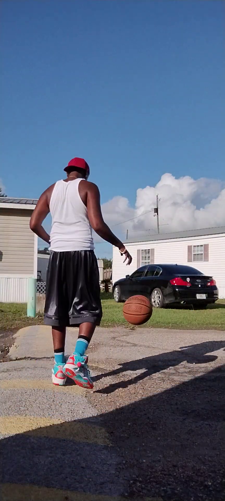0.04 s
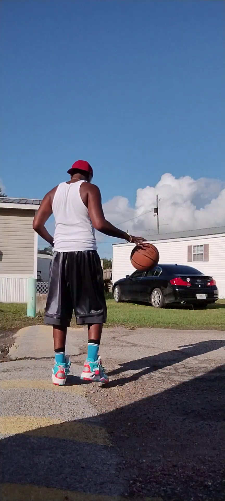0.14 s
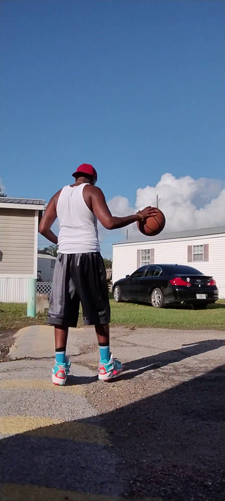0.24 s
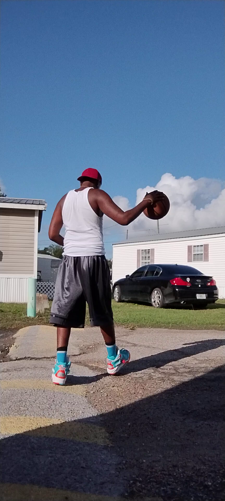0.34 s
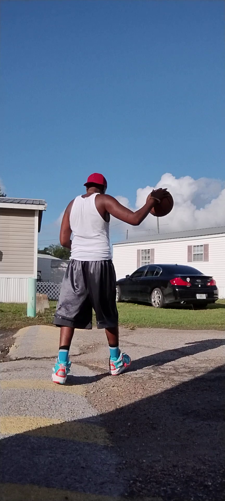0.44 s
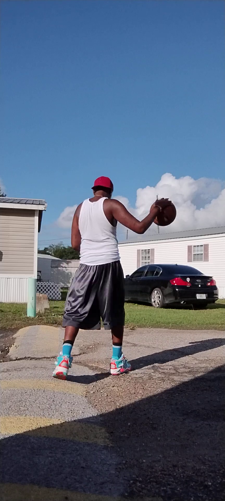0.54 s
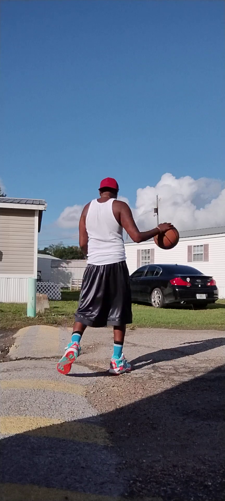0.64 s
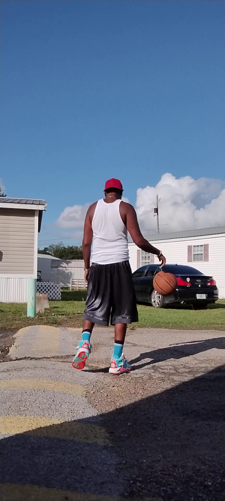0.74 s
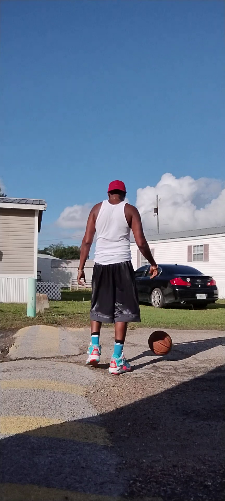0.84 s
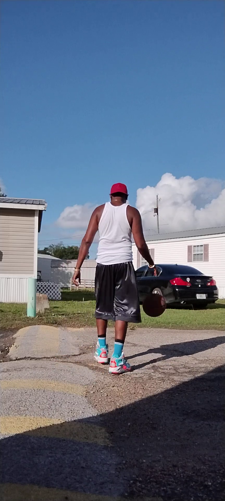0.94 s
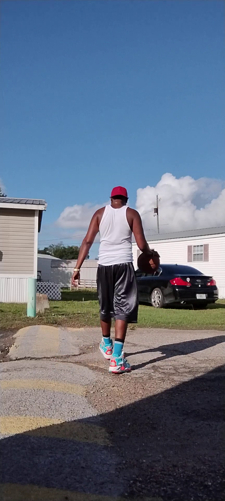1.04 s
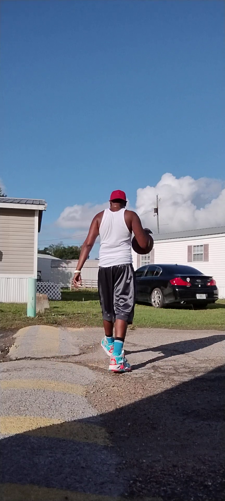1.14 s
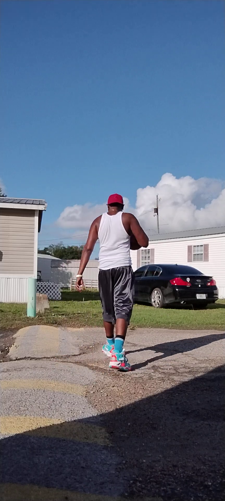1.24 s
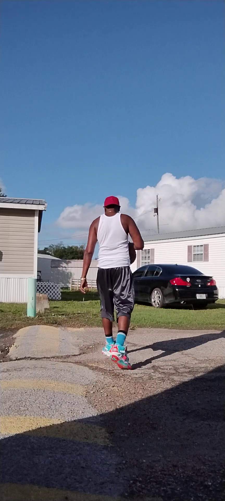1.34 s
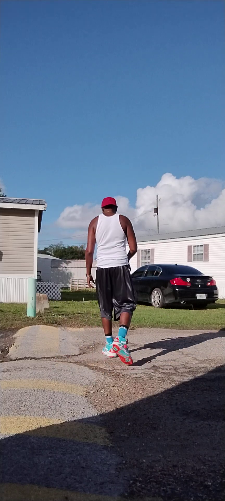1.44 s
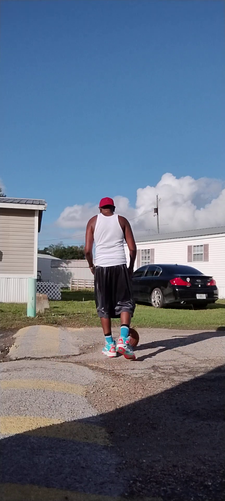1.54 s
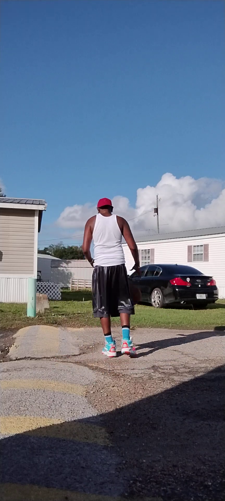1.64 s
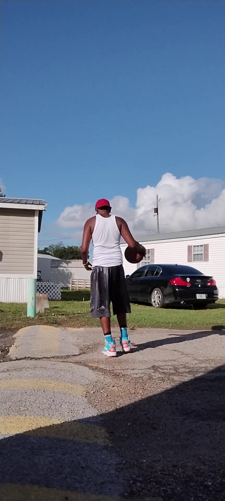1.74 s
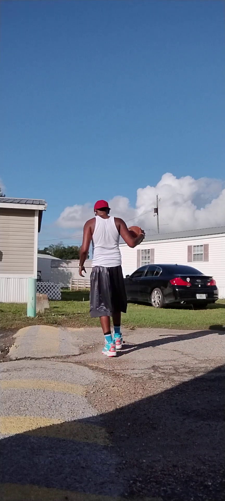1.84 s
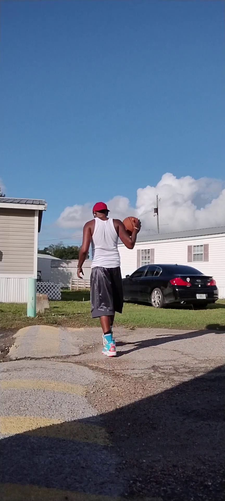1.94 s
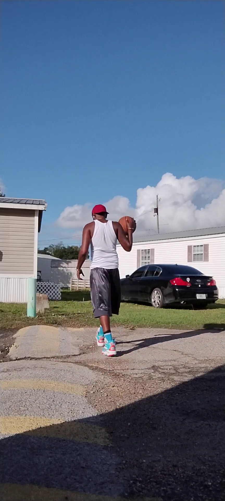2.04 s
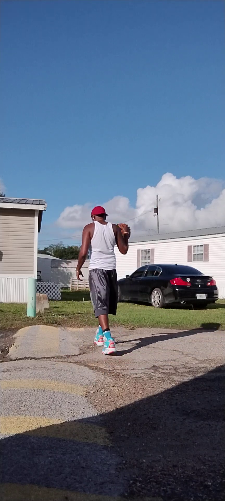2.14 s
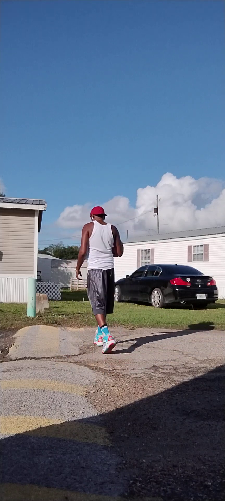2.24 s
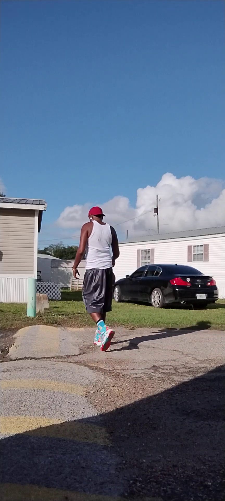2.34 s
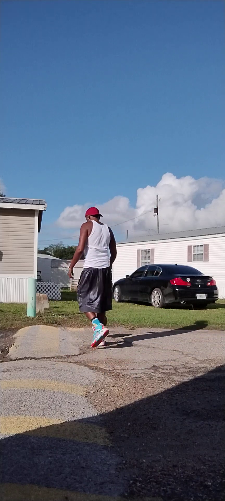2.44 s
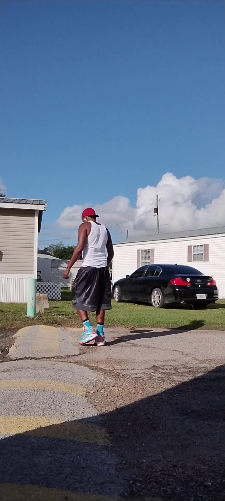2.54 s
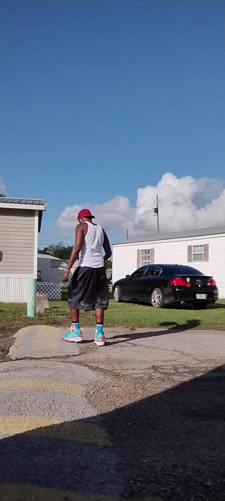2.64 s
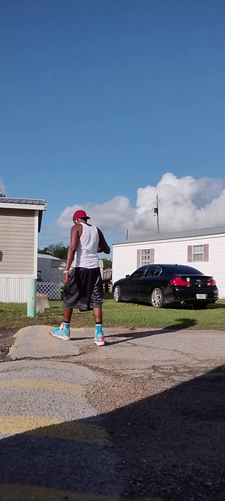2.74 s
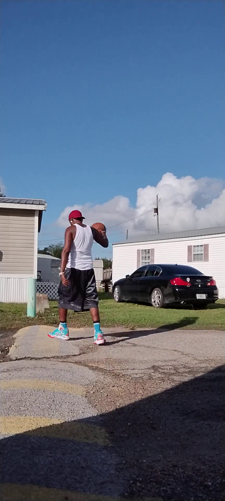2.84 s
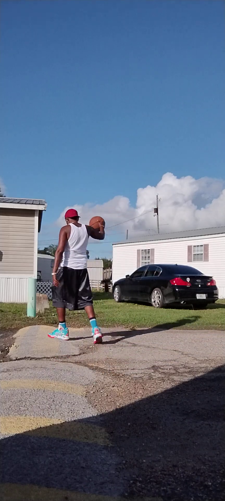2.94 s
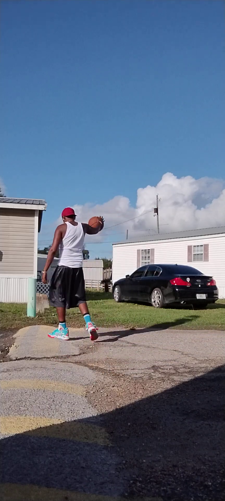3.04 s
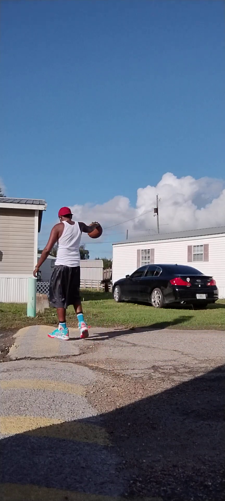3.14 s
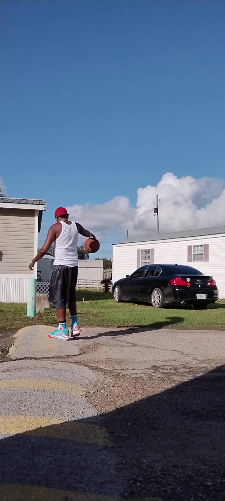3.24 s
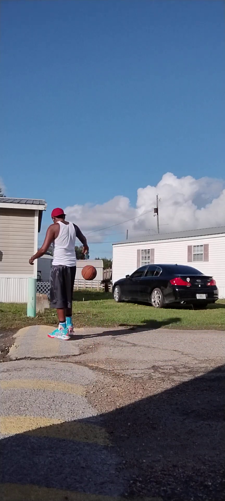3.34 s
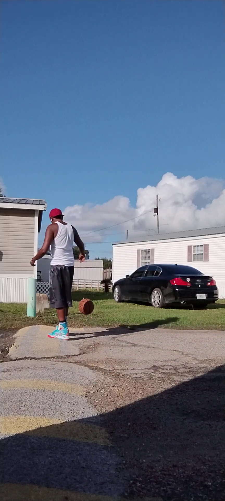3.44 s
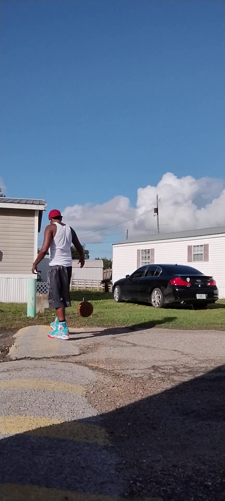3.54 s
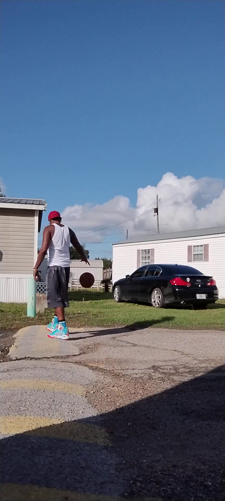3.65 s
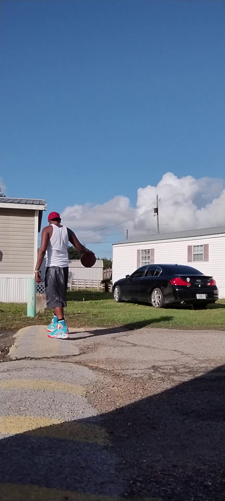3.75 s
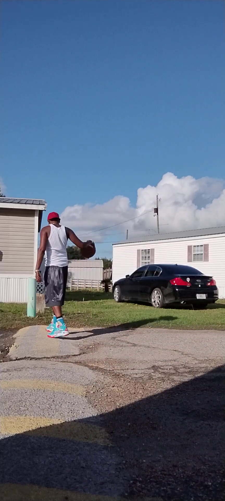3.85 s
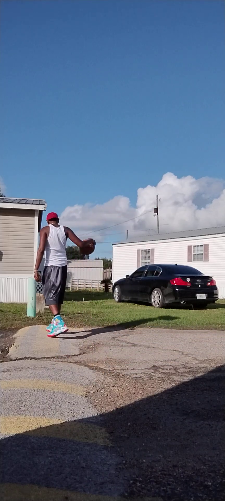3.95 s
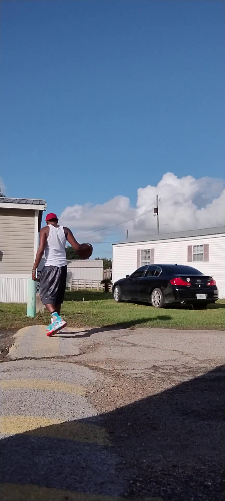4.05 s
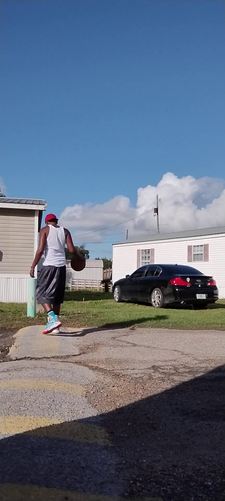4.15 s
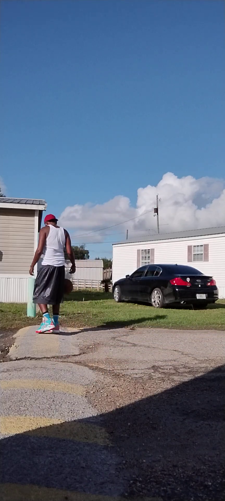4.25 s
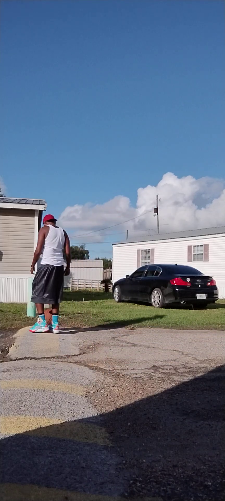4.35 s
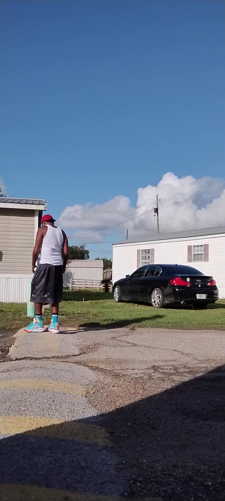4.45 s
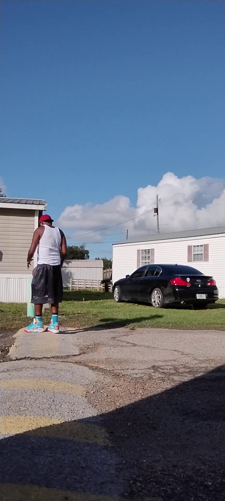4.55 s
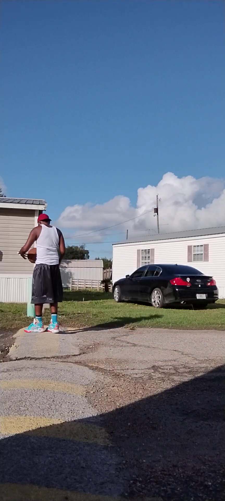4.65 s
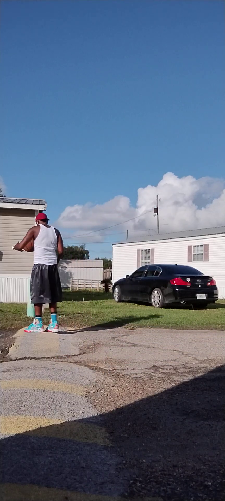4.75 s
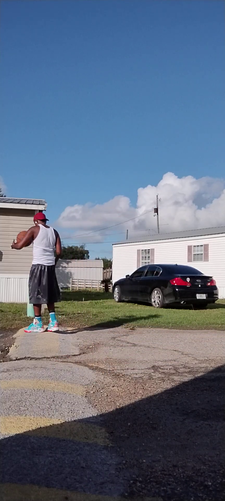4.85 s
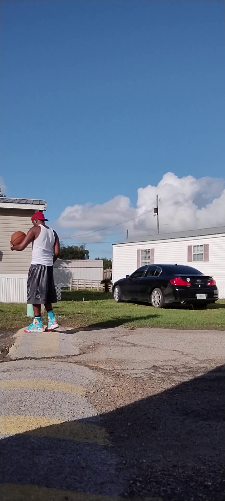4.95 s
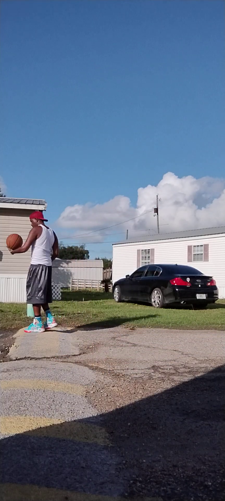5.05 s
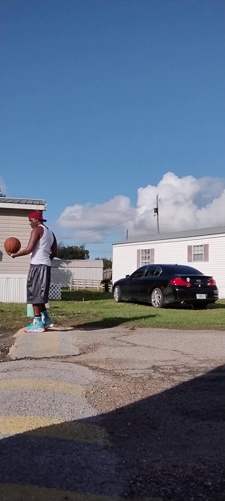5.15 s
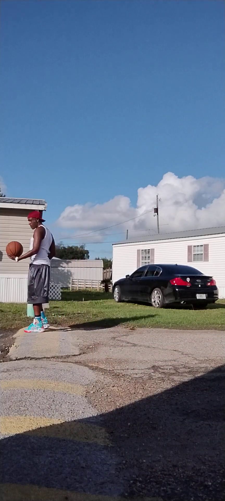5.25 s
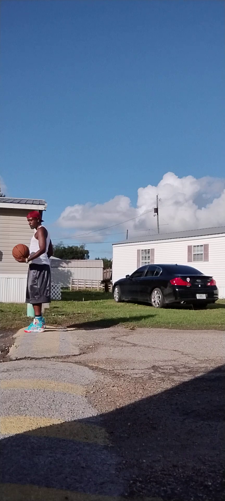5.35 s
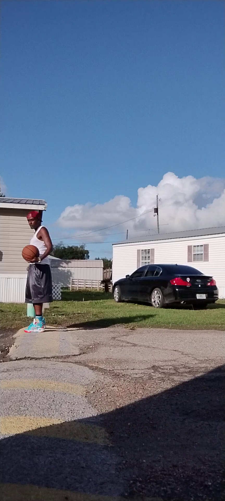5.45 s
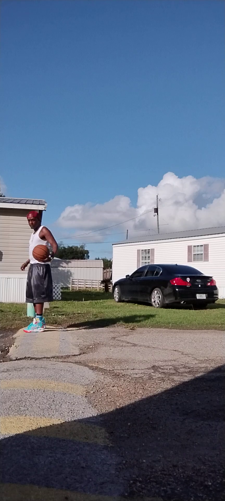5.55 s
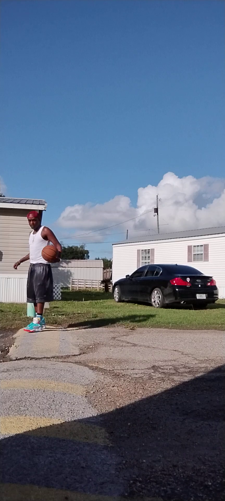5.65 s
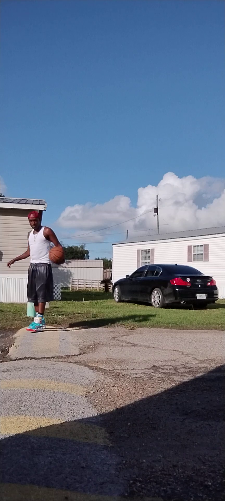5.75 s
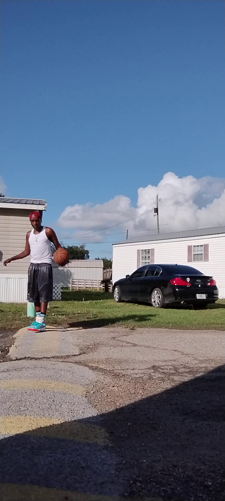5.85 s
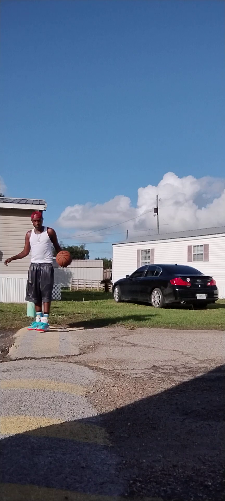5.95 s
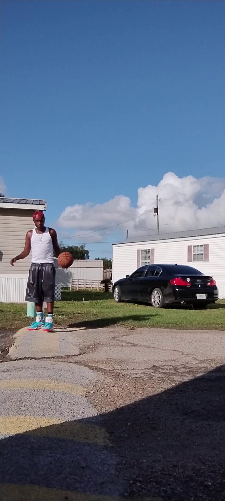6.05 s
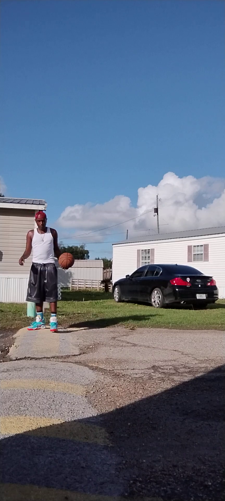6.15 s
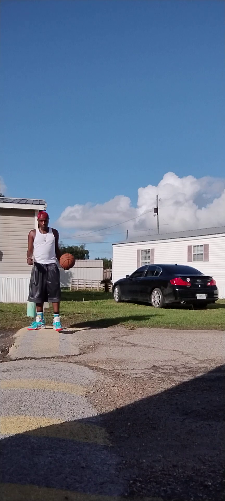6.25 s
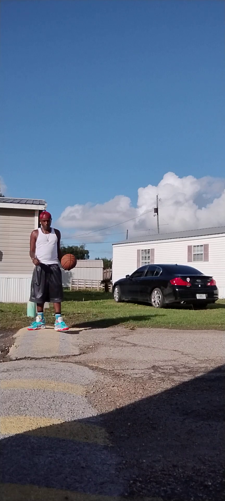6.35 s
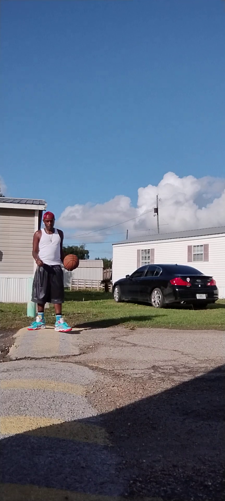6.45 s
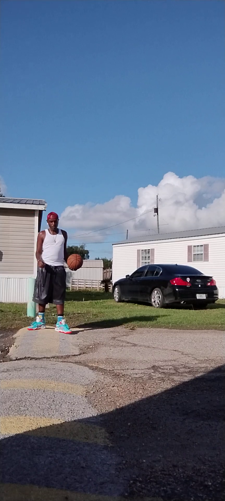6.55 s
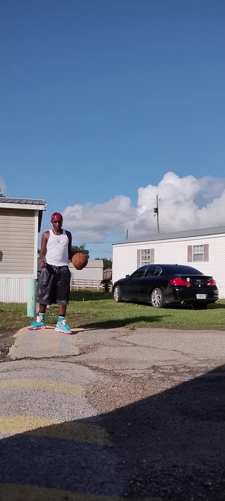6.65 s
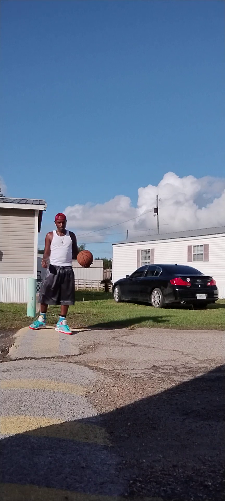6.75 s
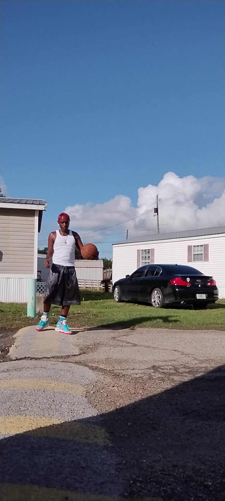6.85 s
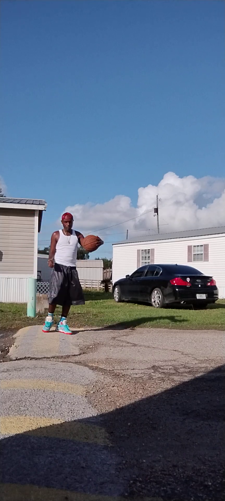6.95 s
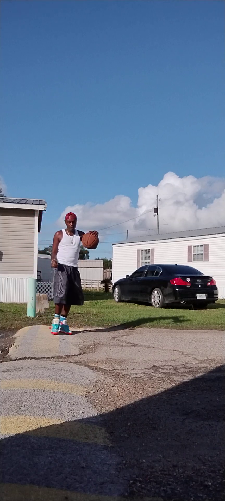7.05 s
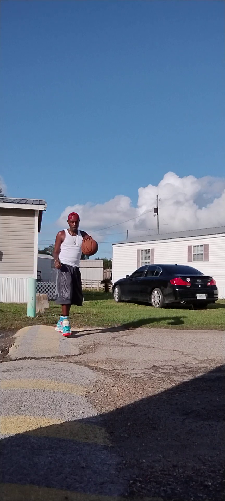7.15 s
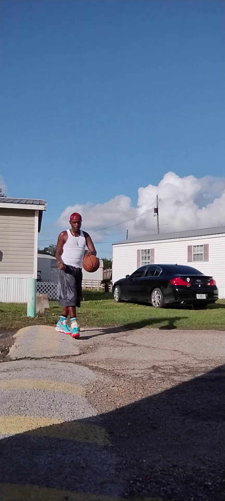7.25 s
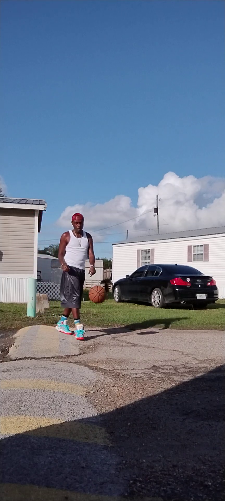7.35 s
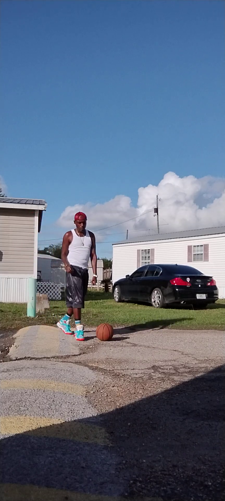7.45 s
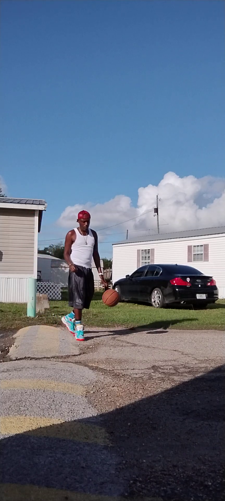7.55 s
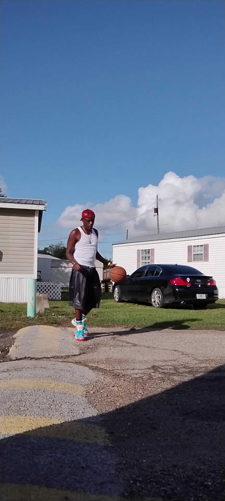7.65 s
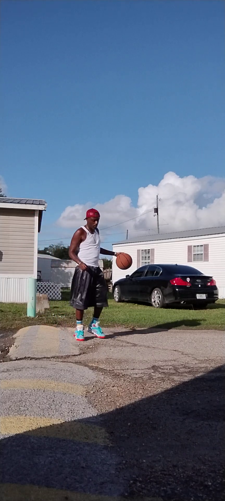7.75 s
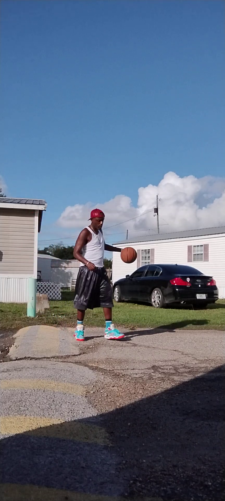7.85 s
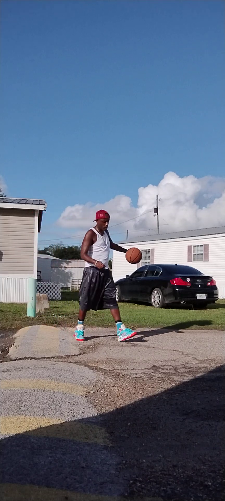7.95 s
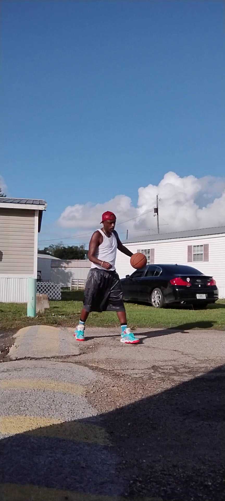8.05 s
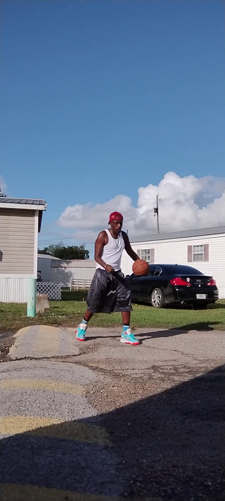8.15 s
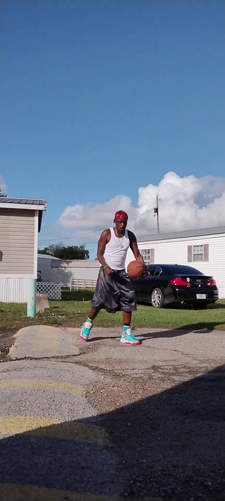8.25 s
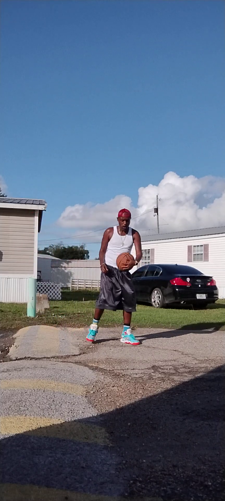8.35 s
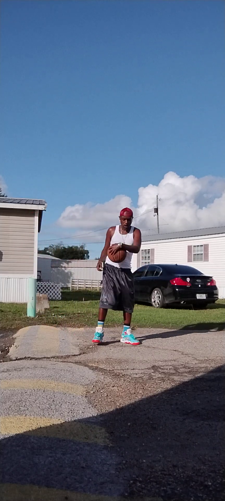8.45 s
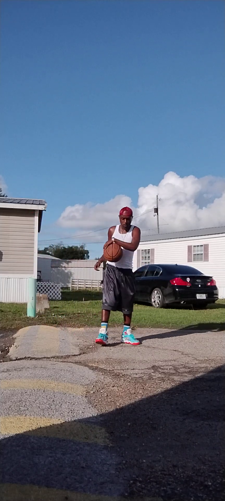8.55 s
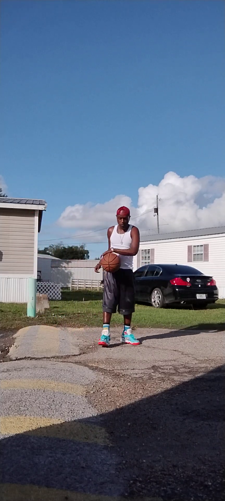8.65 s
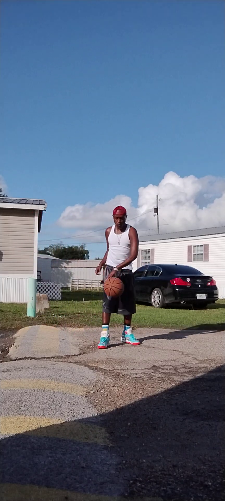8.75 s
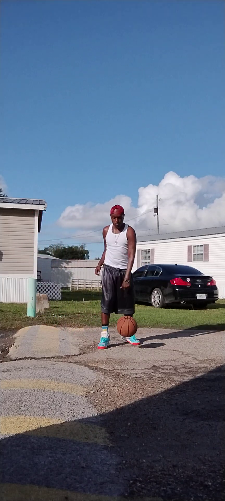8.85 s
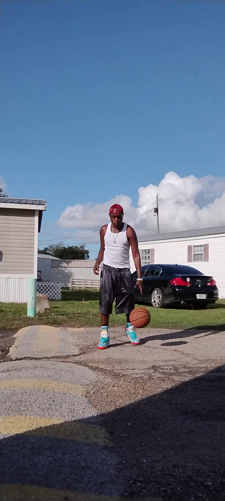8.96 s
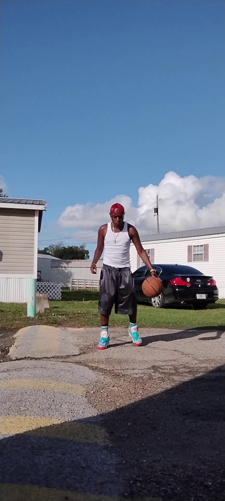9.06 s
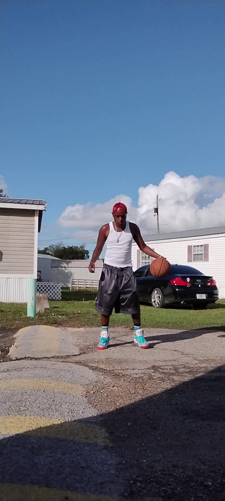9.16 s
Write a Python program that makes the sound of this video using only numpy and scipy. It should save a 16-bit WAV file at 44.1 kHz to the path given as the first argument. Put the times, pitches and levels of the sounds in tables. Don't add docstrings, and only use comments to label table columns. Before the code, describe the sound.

Slow basketball dribbling on a driveway between houses: sharp ringing bounces, low wind rumble, tiny chain ticks, a long pause, then two more bounces.

```python
import sys
import numpy as np
from scipy import signal
from scipy.fft import rfft, irfft, next_fast_len
from scipy.io import wavfile
from scipy.ndimage import uniform_filter1d

SR = 44100
rng = np.random.default_rng(int(sys.argv[2]) if len(sys.argv) > 2 else 0)


def how_loud(loudness_db):
    steps = np.asarray(loudness_db, float) / 20
    return 10 ** steps


def digitize_waveform(pressure):
    field = np.atleast_2d(pressure).T
    bounded = np.clip(field, -1, 1)
    quanta = np.round(bounded * 32767).astype(np.int16)
    wavfile.write(sys.argv[1], SR, quanta)


N = 405279

# start_s, traffic_db, rustle_db
SURROUNDINGS = [(0.0, -59, -63), (0.33, -57.5, -65.5), (0.97, -59, -60.5), (1.12, -50.5, -63.5),
                (2.48, -58, -64), (2.74, -56.5, -63.5), (5.22, -59.5, -71), (7.07, -60, -72),
                (7.52, -55.5, -64), (8.88, -60, -69), (9.19, -52.5, -113)]


def rms_one(x):
    return x / np.sqrt(np.mean(x ** 2) + 1e-20)


def in_time(rows, outside_db=None):
    s, *columns = np.transpose(rows)
    return [np.interp(np.arange(N) / SR, s, c, outside_db, outside_db) for c in columns]


def at_hz(points, hz):
    return np.interp(np.log(hz), np.log(np.array(points)[:, 0]), np.array(points)[:, 1])


def drift(rate):
    r = np.exp(-80 * np.pi * rate / SR)
    slow = signal.lfilter([1], [1, -2 * r, r * r], rng.standard_normal(N // 40 + 2002))[2000:]
    return np.interp(np.arange(N) / 40, np.arange(len(slow)), rms_one(slow))


def modes(table, t, spread_db, detune, turn):
    hz, level_db, t60 = np.transpose(table)[:, :, None]
    luck = rng.standard_normal((3, len(table), 1))
    cycles = hz * (1 + detune * luck[1]) * t + turn * luck[2]
    fading = how_loud(level_db + spread_db * luck[0] - 60 * t / t60)
    return np.sum(fading * np.cos(2 * np.pi * cycles), axis=0)


def band(x, low_hz, high_hz):
    return signal.sosfilt(signal.butter(2, [low_hz, min(high_hz, .45 * SR)], "band", fs=SR, output="sos"), x)


def hiss_band(length, low_hz, high_hz):
    return band(rng.standard_normal((2, length)), low_hz, high_hz)


def add(out, s, sound):
    i = int(np.clip(round(s * SR), 0, N))
    out[:, i:i + sound.shape[-1]] += sound[..., :N - i]


def pan(x, lr_db):
    return x * how_loud([[lr_db / 2], [-lr_db / 2]])


def coloured(spectrum, patchy_db):
    # pitch_hz, likeness (-1 to 1)
    likeness = [(60, 0.98), (150, 0.99), (380, 0.85), (950, 0.56), (2380, 0.073), (5980, -0.13),
                (15000, -0.13)]
    # pitch_hz, left_right_db
    balance = [(60, 0.5), (180, 0), (550, -1), (1650, 4.5), (4970, 0.0), (15000, -8.5)]
    size = next_fast_len(N, True)
    hz = np.maximum(np.arange(size // 2 + 1) * SR / size, 1)
    mid, side = rfft(rng.standard_normal((2, size))) * how_loud(at_hz(spectrum, hz))
    alike = np.clip(at_hz(likeness, hz), -1, 1)
    pair = np.sqrt(1 + alike) * mid + np.sqrt(1 - alike) * side * [[1], [-1]]
    pair = pair * how_loud(np.outer([.5, -.5], at_hz(balance, hz)))
    return rms_one(irfft(pair, size)[:, :N] * how_loud(patchy_db * drift(9.8)))


def patches(x, depth_db):
    spots = signal.stft(x, nperseg=1024)[2]
    field = rng.standard_normal(spots.shape[1:])
    field = uniform_filter1d(uniform_filter1d(field, size=9, axis=0), size=4, axis=1)
    return signal.istft(spots * how_loud(depth_db * rms_one(field)), nperseg=1024)[1][:, :N]


def gusts():
    # peak_s, fall_s (time to fall 10 dB, held to at least 0.01), left_db, right_db
    gust_table = [(0.1, 0.01, -22, -57), (0.8, -1.05, -44, -66), (1.05, -0.01, -33, -38),
                  (1.2, .09, -25, -54), (1.5, 0.1453, -18, -28), (1.65, 0.21, -33, -25),
                  (1.83, 0.1047, -23, -36), (2.12, 0.15, -35.5, -36), (2.33, 0.06, -31, -55),
                  (2.67, 0.0756, -25.5, -27), (2.901, 0.0458, -21, -40), (3.09, 0.06, -20.5, -31),
                  (3.24, 0.15, -41, -58), (3.4, 0.5, -44, -45), (3.6, -0.13, -39, -52),
                  (3.702, -0.17, -82, -31), (4.002, 0.02, -17, -55), (4.15, 0.13, -56, -52),
                  (4.3, 0.3, -40.5, -44), (4.58, 0.0376, -20.5, -19), (9.0, 0.04, -19, -23.5),
                  (9.1, 0.12, -24, -27)]
    # pitch_hz, level_db (per Hz)
    gust_colour = [(30, -9), (55, 1), (85, 8.5), (120, -0.5), (200, -6.5), (300, -13.5), (450, -33.5),
                   (700, -57.5)]
    breeze_db = -61.5
    size = next_fast_len(N, True)
    hz = np.maximum(np.arange(size // 2 + 1) * SR / size, 1)
    noise = irfft(rfft(rng.standard_normal((2, size))) * how_loud(at_hz(gust_colour, hz)), size)[:, :N]
    lumps = how_loud(1.54 * np.array([drift(40), drift(18.0)]))
    steps = np.arange(0, N, 100) / SR
    force = how_loud(breeze_db)
    for s, fall, left_db, right_db in gust_table:
        force = force + how_loud([[left_db], [right_db]] - 10 * abs(steps - s) / max(fall, .01))
    force = np.array([np.interp(np.arange(N) / SR, steps, f) for f in force])
    return force * how_loud(-4.5) * rms_one(noise * lumps)


def buffets():
    # peak_s, peak_db, pitch_hz
    left_puffs = [(0.842, -24, 106), (1.121, -19, 111.6), (1.157, -23.5, 102.6), (1.199, -19, 90.5),
                  (1.232, -18, 84), (1.29, -26.5, 134), (1.328, -18, 119), (1.411, -18, 124),
                  (1.478, -12, 128), (1.529, -14, 159), (1.564, -16.5, 154), (1.818, -17, 106),
                  (1.849, -20.5, 126.3), (1.923, -20, 138), (2.023, -24, 110), (2.169, -23, 102),
                  (2.274, -24, 107), (2.35, -21.5, 106), (2.431, -21.5, 84.4), (2.848, -18, 114.4),
                  (2.937, -13, 138), (2.978, -16.5, 123), (3.08, -18, 101), (3.153, -19.5, 104.5),
                  (3.961, -22.5, 112), (4.064, -21, 97), (4.322, -20, 121), (4.644, -23, 106),
                  (9.053, -19, 135), (9.09, -19, 115)]
    # peak_s, peak_db, pitch_hz
    right_puffs = [
        (1.241, -28, 101),
        (1.264, -21.5, 96),
        (1.415, -22, 180),
        (1.49, -15, 112),
        (1.549, -16.5, 149),
        (1.572, -29, 112),
        (3.299, -25, 100),
        (8.979, -43, 121),
        (9.063, -22, 138),
        (9.102, -26, 141),
    ]
    out, t = np.zeros((2, N)), np.arange(-1500, 1500) / SR
    for port, rows in zip(np.eye(2)[:, :, None], (left_puffs, right_puffs)):
        for s, peak_db, puff_hz in rows:
            swell = np.exp(-(t * puff_hz / 0.75) ** 2)
            puff = swell * np.cos(2 * np.pi * (puff_hz * t + rng.random()))
            add(out, s + t[0], how_loud(peak_db) * puff * port)
    return out


def traffic():
    # pitch_hz, level_db (per Hz)
    traffic_colour = [(20, -38), (43, -9.5), (109, -0.5), (190, -11), (400, -19), (1860, -29), (3180, -37),
                      (14000, -50)]
    traffic_db = in_time(SURROUNDINGS)[0]
    swell_db = 0.9 * (traffic_db - np.median(traffic_db))
    return how_loud(-49.5 + swell_db) * coloured(traffic_colour, patchy_db=1.1)


def rustle():
    rustle_db = in_time(SURROUNDINGS)[1]
    snaps = rng.random(N) < 150.0 * how_loud(6.0 * drift(4)) / SR
    crackle = 1 + 2.2 * snaps * rng.exponential(1, N)
    hiss = rms_one(band(rng.standard_normal((2, N)) * crackle, 8300, 15600))
    return how_loud(rustle_db - 5 + 0.62 * drift(46)) * hiss


def far_hum():
    return how_loud(-78 + 1.5 * drift(3)) * rms_one(hiss_band(N, 1750, 2330))


def whistles():
    # start_s, end_s, pitch_hz, level_db
    whistle_table = [(4.1, 4.4, 2830, -81), (4.6, 5.05, 2835, -75), (5.1, 5.22, 2850, -77),
                     (5.6, 5.78, 2850, -78), (6.28, 6.43, 2255, -69), (6.54, 6.67, 2255, -70),
                     (6.68, 6.9, 2210, -75), (5.2, 5.45, 2025, -75), (5.3, 6.2, 1900, -76),
                     (3.75, 4.12, 1880, -71), (4.7, 5.15, 2220, -77), (0, 9.19, 532, -67)]
    out = np.zeros((2, N))
    waver_db, waver_hz = 4 * drift(12), 10 * drift(14)
    for start, end, line_hz, line_db in whistle_table:
        span = slice(int(start * SR), int(end * SR))
        on = np.sin(np.linspace(0, np.pi, span.stop - span.start)) ** .5
        cycles = np.cumsum(line_hz + waver_hz[span]) / SR
        add(out, start, on * how_loud(line_db + waver_db[span]) * np.sin(2 * np.pi * cycles))
    return out


def ticks():
    # start_s, peak_db, ringing_share (0-1), left_right_db
    tick_table = [(0.0034, -34.5, 0.48, -3.5), (0.3476, -54, 0.1, -5), (.571, -56, .1, -2),
                  (.659, -54, .2, -2), (7.377, -56, .1, -2), (7.486, -56, .1, -2), (7.497, -54, .3, -2),
                  (7.513, -56, .1, -2), (7.523, -52, .05, -2), (7.549, -57, .1, -2), (5.44, -59, .1, -2),
                  (5.78, -59, .2, -2), (6.815, -59, .1, -2), (5.67, -57, .2, -2), (0.3753, -50, 0.27, 0),
                  (0.6473, -47, 0.3, -5), (0.708, -52, 0.4, -2.0), (0.898, -43, 0.4, -1),
                  (0.909, -47, 0.3, -4), (0.927, -44.5, 0.35, -7), (1.138, -37, 0.3, -1),
                  (1.255, -45, 0.48, -4), (1.495, -44.5, 0.1, -7), (1.784, -53, 0.27, -17),
                  (1.8927, -46.5, 0.44, -1.5), (2.35, -45.5, 0.15, -1.0), (2.378, -47, 0.3, -1.0),
                  (2.413, -46, 0.27, -1), (2.6989, -45, 0.4, -8), (2.8973, -41, 0.12, -2),
                  (2.9651, -37.5, 0.27, 4), (3.047, -41.5, 0.47, -9), (3.4096, -56, 0.4, -1.5),
                  (4.174, -52, 0.42, -5), (4.8474, -51, 0.6, 2), (5.654, -56, 0, -9),
                  (7.065, -51.5, 0.26, -6), (7.453, -45.5, 0.14, -5), (8.0531, -47, 0.65, 6),
                  (8.214, -46, 0.22, -1), (8.631, -54, 0.55, -3), (8.9785, -56, 0.3, -22)]
    # pitch_hz, level_db, t60_s
    link_modes = [(9100, -1, 0.031), (10060, -4, 0.078), (9630, 9, 0.052), (11060, 14.5, 0.018),
                  (12300, -23, .03), (13100, -2, .025)]
    out, t = np.zeros((2, N)), np.arange(int(.15 * SR)) / SR
    for s, peak_db, rings, lr_db in tick_table:
        rings = np.clip(rings, 0, 1)
        dry_grit = (how_loud(-60 * t / 0.011) + how_loud(-12 - 60 * t / 0.2)) * hiss_band(len(t), 4750, 21000)
        link = modes(link_modes, t, spread_db=3.0, detune=.006, turn=.3)
        blend = (1 - rings) * dry_grit + 0.57 * rings ** 2 * link
        add(out, s, pan(how_loud(peak_db + 1.5) * (1 - np.exp(-t / .0014)) * blend, lr_db))
    return out


def wall_echoes(out, s, near, echo_db, second_db, push, bright):
    # delay_s (after the nearest wall), level_db, left_right_db
    wall_table = [(0, -2, 1.5), (.0065, -2, -1.5), (.013, -11, -1), (0.021, -5.5, 1), (0.035, -14, 2),
                  (.095, -18, 1.5), (.112, -17, 5), (0.161, -21, 1)]
    for k, (delay, wall_db, lr_db) in enumerate(wall_table):
        ribs = rng.standard_normal((2, 900)) * np.hanning(900) ** 2.6 * how_loud(-29.5)
        echo = push + signal.fftconvolve(ribs, [bright], axes=1)[:, :len(push)]
        level = how_loud(echo_db + wall_db + second_db * (k == 1))
        add(out, s + near + delay * (1 + .05 * rng.standard_normal()), pan(echo, lr_db) * level)


def scatter(t, near, slap_db):
    first_echoes = np.exp(-((t - near - .015) / 0.0049) ** 2)
    tail = how_loud(slap_db - 23 - 60 * t / 0.79) * (0.67 + first_echoes * 0.96)
    return tail * (1.5 * hiss_band(len(t), 300, 1350) + .6 * hiss_band(len(t), 1400, 3200))


def bounces():
    # start_s, slap_db (peak), push_db, grit_db, echo_delay_s (nearest wall)
    bounce_table = [
        (0.057, -12, -13, -28, 0.056),
        (0.9665, -7, -15.5, -29.5, 0.053),
        (1.645, -11, -12.5, -37, 0.048),
        (2.6075, -13, -13.5, -40, 0.043),
        (3.6345, -17, -15.5, -34, 0.042),
        (4.496, -12.5, -17, -41, .040),
        (7.5795, -14.5, -16, -38, 0.048),
        (9.017, -17, -16.5, -34, 0.049),
    ]
    # shell_db, casing_db, ring_db (cavity), then over it low_db, middle_db, upper_db, top_db;
    # tilt_db (casing low over high)
    paving = [(-16, -21.5, -21.5, -8, 4, .5, -4, -5), (-16, -21.5, -16, -8.5, .5, -.5, -9, 2),
              (-13.5, -24.5, -24.5, 4, -8.5, -14, -9, -6), (-17.5, -26, -29, -4.5, 0, -1.5, -5, 9),
              (-30, -25.5, -22.5, -8.5, -9.5, -1.5, -14, 0), (-25.5, -30.5, -27, -10.5, 0, -2, -15, 7),
              (-23.5, -25.5, -16, -7.5, -4.5, -4.5, -14, -3), (-18, -23, -27, -1, 7, 0, -9, 9)]
    # slap_s (after the push starts), cushion_db, walls_db, second_db (second wall)
    landing = [(-.0003, -24, 2, -12), (0.0002, -24, -1.5, -9), (-.0008, -20, -1, -1), (-.0004, -18, -2, -8),
               (.0003, -21, -5, -1), (.0006, -22, -4, -6), (.0009, -24, -3.5, 3), (.0012, -12, 0, -8)]
    # pitch_hz, level_db, t60_s
    cavity_modes = np.array([(724, 4, .022), (840, -2.5, 0.027), (969.5, -17, 0.14), (975, 2.5, 0.022),
                             (1106, -3.5, 0.04), (1202, -3, 0.04), (1435, -5.5, 0.054), (1567, -3.5, 0.034),
                             (1681, -2, 0.045), (1787, 0.5, 0.035), (2060, 3, 0.014), (2290, -6.5, 0.041),
                             (2648, -6.5, 0.055), (3100, -10, 0.015)])
    paving_hz = [730, 1030, 1350, 1700, 2400]
    # pitch_hz, level_db, t60_s
    push_modes = [(138, -4.5, 0.045)]
    # pitch_hz, level_db, t60_s
    shell_modes = [(242.4, 0.0018, 0.042)]
    # pitch_hz, level_db, t60_s
    casing_modes = [(365, -4, .035), (430, -5, .03), (495, -2, .045), (570, -5, .025), (650, -4, .03)]
    rebound_s = 0.00803
    port_lag = 7.8
    only_level = [0, 1, 0]
    out, t = np.zeros((2, N)), np.arange(int(.3 * SR)) / SR
    for bounce, ground, land in zip(bounce_table, paving, landing):
        s, slap_db, push_db, grit_db, near = bounce
        shell_db, casing_db, ring_db, low_db, middle_db, upper_db, top_db, tilt_db = ground
        slap_s, cushion_db, walls_db, second_db = land

        fall = t[:900] - .008
        cushion = -how_loud(cushion_db) * np.exp(-np.abs(fall) / np.where(fall < 0, .0025, .0008))
        add(out, s + slap_s - .0073, cushion * [[1], [1]])

        contact = (1 - np.exp(-t / .003)) ** 2
        shell = how_loud(shell_db + 11) * modes(shell_modes, t - .001, spread_db=.5, detune=.02, turn=.01)
        air = how_loud(push_db + 17.5) * modes(push_modes, t - .001, spread_db=.5, detune=.02, turn=.01)
        push = contact * (shell - air)

        since = np.maximum(t - rebound_s, 0)
        tilt = np.linspace(.5, -.5, len(casing_modes)) * tilt_db
        tilted = casing_modes + np.outer(tilt, only_level)
        casing = modes(tilted, since, spread_db=2.5, detune=0.03, turn=0.31)
        casing = how_loud(casing_db + 10.5) * (1 - np.exp(-since / 0.0038)) * casing

        touch = 1 - np.exp(-t / .0006)
        ground_colour = np.c_[paving_hz, [low_db, 0, middle_db, upper_db, top_db]]
        struck_db = ring_db + at_hz(ground_colour, cavity_modes[:, 0])
        struck = cavity_modes + np.outer(struck_db, only_level)
        slap = -touch * how_loud(3.5) * modes(struck, t - .0005, spread_db=0.0, detune=0.012, turn=0.13)
        rough = touch * how_loud(slap_db - 16.5 - 60 * t / 0.082) * hiss_band(len(t), 500, 2440)
        crunch = hiss_band(len(t), 1870, 6120) + how_loud(-2.5) * hiss_band(len(t), 9460, 13300)
        grit = how_loud(grit_db + 5.0 - 60 * t / 0.033) * crunch
        late = np.interp(t - port_lag / SR, t, slap, 0)
        add(out, s, push + pan(casing, -3.0))
        add(out, s + slap_s, pan(np.array([late, slap]) + rough, 1.5) + pan(grit, -2.5))

        lead_in = np.linspace(0, 1, 265) * hiss_band(265, 500, 3100)
        add(out, s + slap_s - .006, how_loud(slap_db - 25) * lead_in)

        echo_db = 4.0 - 320 * near + walls_db
        bright = slap + 1.3 * casing + how_loud(0.6) * grit[0]
        wall_echoes(out, s, near, echo_db, second_db, push, bright)
        add(out, s, scatter(t, near, slap_db))
    return out


def whine():
    # start_s, pitch_hz, level_db
    whine_table = [
        (0.8, 827, -66),
        (1.3, 812, -66),
        (2.3, 815, -72),
        (3.0, 815, -61.5),
        (3.4, 829, -65.5),
        (4.3, 805.5, -66.5),
        (5.2, 798, -66.5),
        (5.9, 800, -63.5),
        (6.5, 814, -75.5),
    ]
    hz, level_db = in_time(whine_table)[0], in_time(whine_table, -120)[1]
    cycles = np.cumsum(hz + 3 * drift(15) + 5 * drift(3)) / SR
    return how_loud(level_db + 2.5 * drift(7)) * np.sin(2 * np.pi * cycles)


def scuffs():
    # start_s, peak_db, pitch_hz (centre), t60_s
    scuff_table = [(1.113, -55, 1500, 0.1), (1.135, -39, 2072, 0.035), (1.137, -49, 3570, 0.02),
                   (1.786, -50, 885, 0.029), (2.872, -55, 940, 0.03), (2.869, -58, 1600, .03),
                   (2.882, -45, 1720, 0.022), (2.883, -50, 800, 0.025), (2.896, -45, 1650, 0.02),
                   (2.92, -50, 900, 0.022), (2.896, -28, 720, 0.02), (4.325, -57, 890, 0.062),
                   (4.335, -60.5, 1710, 0.044), (5.43, -60, 895, 0.12), (5.645, -63, 1800, 0.075),
                   (5.67, -60.5, 1720, 0.082), (7.721, -52, 1977, 0.038), (7.374, -45, 850, 0.02),
                   (7.454, -31.5, 700, 0.018), (8.186, -64.5, 1670, 0.17), (9.16, -52, 2000, 0.04),
                   (9.125, -62, 1380, .2), (2.963, -58, 3300, .02)]
    out, t = np.zeros((2, N)), np.arange(int(.25 * SR)) / SR
    for s, peak_db, hz, t60 in scuff_table:
        grains = rng.standard_normal((2, len(t))) * (1 + 5 * (rng.random(len(t)) < 600 / SR))
        burst = band(grains + grains[0], hz / 1.25, hz * 1.2)
        burst = rms_one(band(burst, hz / 1.8, hz * 1.5))
        add(out, s, how_loud(peak_db + 11.0 - 60 * t / t60) * (1 - np.exp(-t / 0.0029)) * burst)
    return out


def drags():
    # start_s, end_s, level_db
    drag_table = [
        (1.15, 1.26, -60),
        (1.46, 1.5, -56),
        (1.87, 1.98, -62),
        (2.34, 2.45, -60),
        (2.67, 2.705, -52),
        (2.865, 2.905, -54),
        (2.962, 2.995, -51),
        (2.998, 3.055, -51),
        (3.05, 3.14, -60),
        (3.32, 3.43, -62),
    ]
    noise, stroke = rng.standard_normal((2, N)), np.zeros((1, N))
    rub = rms_one(band(noise, 7100, 12500) + 0.88 * band(noise, 9100, 10500))
    for start, end, level_db in drag_table:
        swell = np.sin(np.linspace(0, np.pi, int((end - start) * SR))) ** .5
        add(stroke, start, how_loud(level_db) * swell)
    return pan(rub * stroke * how_loud(-5.5 + 4.4 * drift(63)), -1.5)


def passing_car():
    # start_s, level_db
    car_table = [
        (6.5, -89),
        (7.0, -60.5),
        (7.4, -55),
        (7.7, -51.5),
        (8.2, -63),
        (8.7, -92),
    ]
    # pitch_hz, level_db (per Hz)
    tyre_colour = [(150, -10), (300, 15.5), (600, 7), (1000, 9.5), (1500, 1.5), (2300, -42), (4000, -128)]
    return how_loud(in_time(car_table, -120)[0]) * coloured(tyre_colour, patchy_db=.4)


def scene():
    backdrop = patches(traffic() + rustle() + far_hum() + passing_car(), depth_db=1.3)
    far_tones = whistles() + whine()
    player = ticks() + bounces() + scuffs() + drags()
    return gusts() + buffets() + backdrop + far_tones + player


def low_pass(x):
    return signal.sosfilt(signal.butter(12, 15620, fs=SR, output="sos"), x)


def record(dry):
    x = signal.sosfilt(signal.butter(2, 45.0, "high", fs=SR, output="sos"), dry)
    x = signal.sosfilt(signal.cheby2(8, 35, 15050, fs=SR, output="sos"), x)
    mix = 1.5 * np.tanh(x / 1.4)
    return low_pass(mix)


dry = scene()
out = record(dry)
digitize_waveform(out)
```